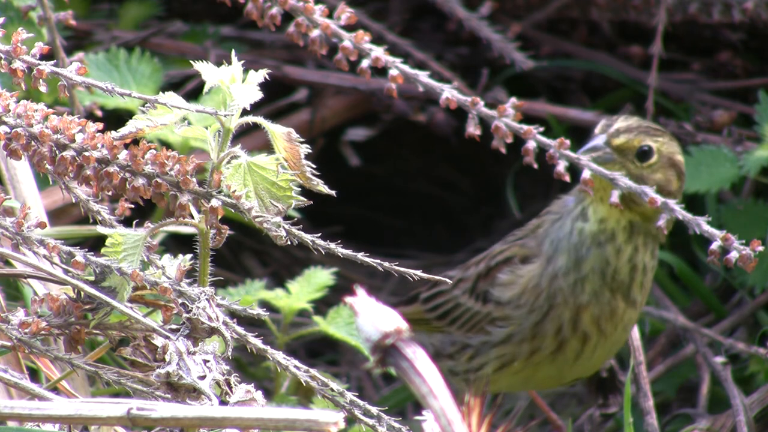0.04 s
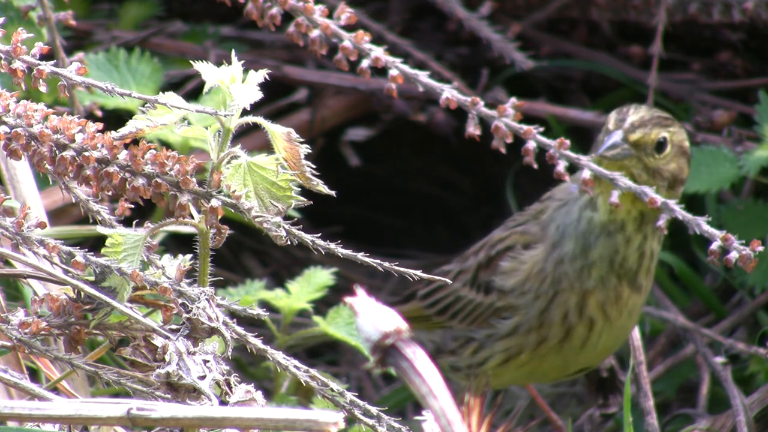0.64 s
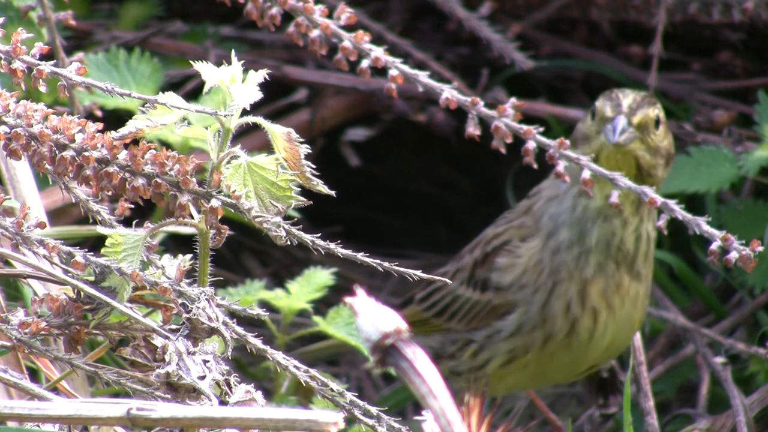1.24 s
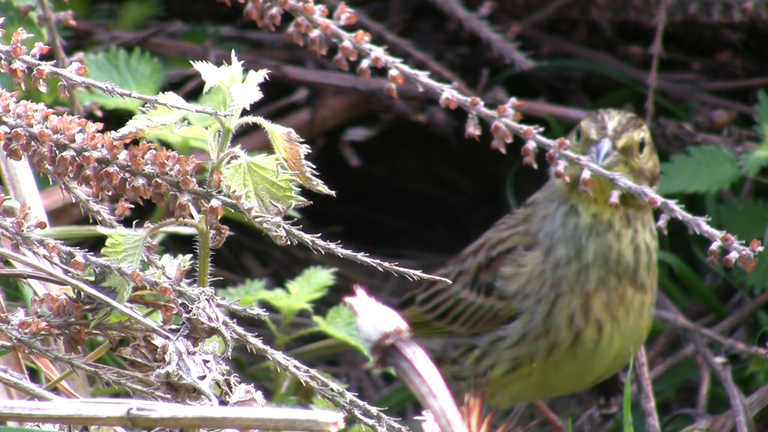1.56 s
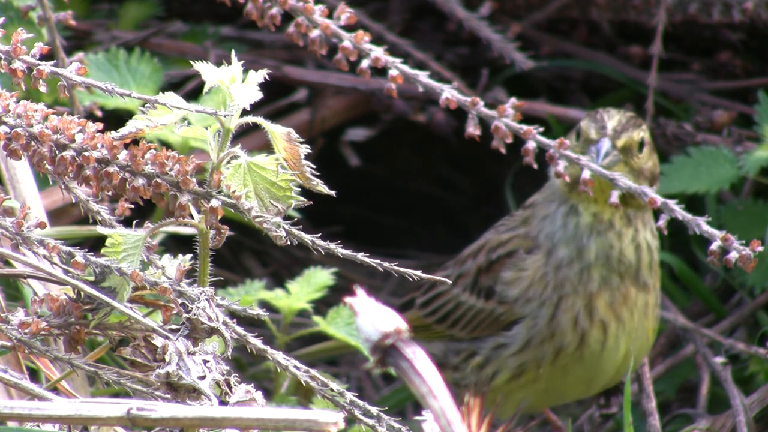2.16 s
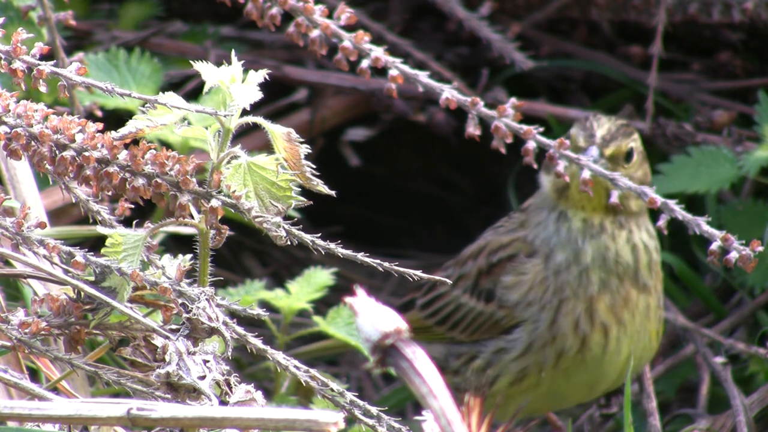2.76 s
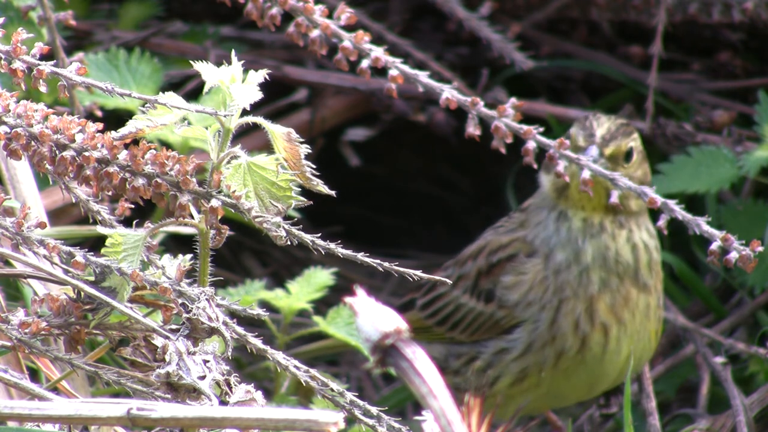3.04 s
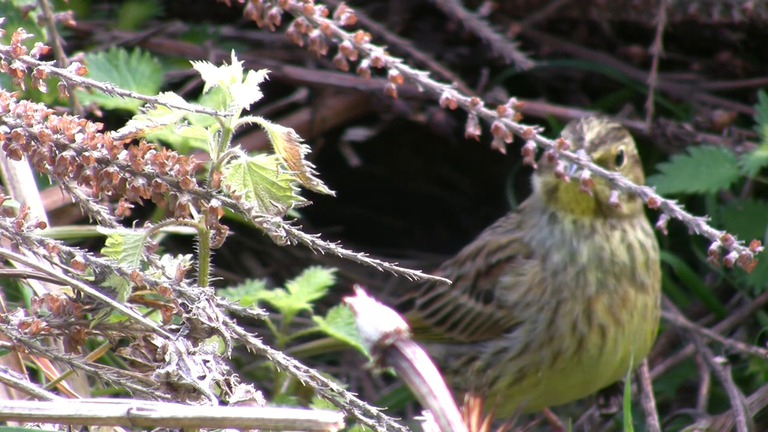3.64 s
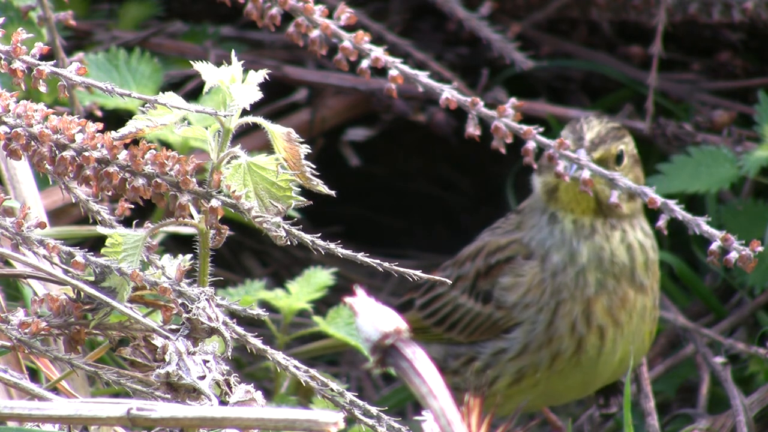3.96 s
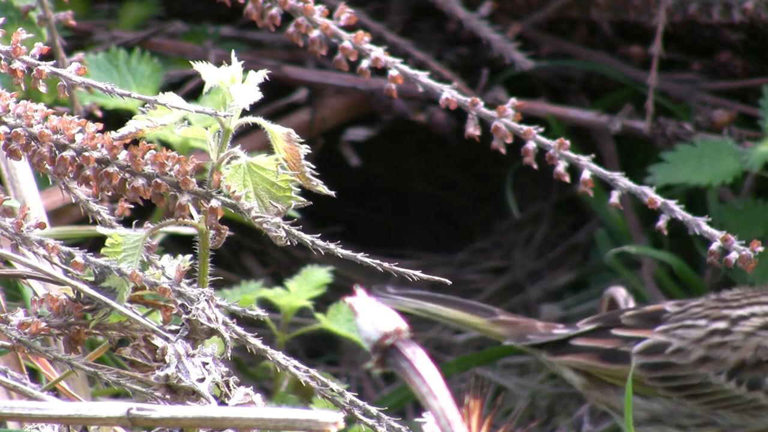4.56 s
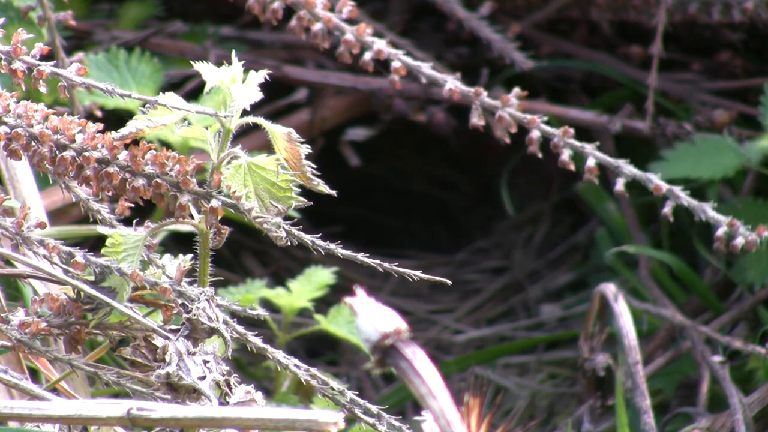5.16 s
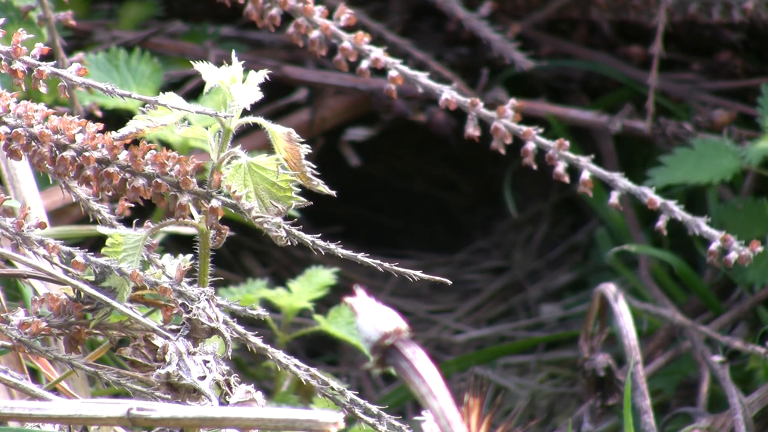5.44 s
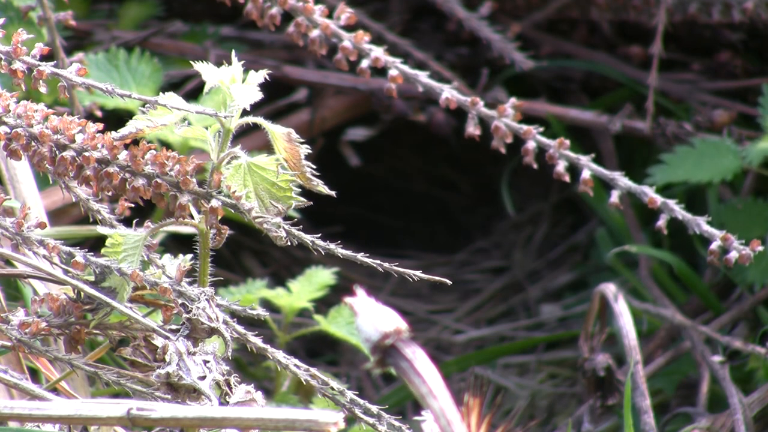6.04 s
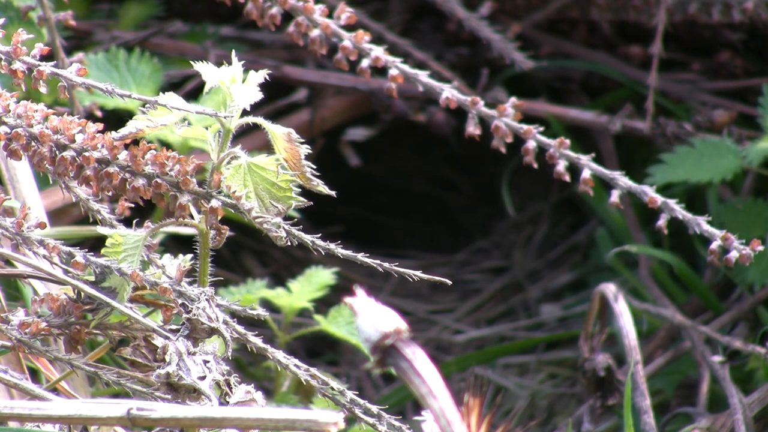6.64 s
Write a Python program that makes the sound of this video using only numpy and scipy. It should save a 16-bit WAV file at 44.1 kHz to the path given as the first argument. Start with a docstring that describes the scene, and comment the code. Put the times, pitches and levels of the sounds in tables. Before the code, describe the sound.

Songbirds chirp over a soft countryside hush, joined halfway by low wind rumble, a faint rustle and a fast high trill ending in a buzz.

```python
"""An overgrown garden, on a stereo microphone open to the hush of the countryside.
A great tit see-saws far off, a finch twitters nearby and small birds call faintly from the hedges;
their whistles are near sines from the syrinx, echoed by leaves. Halfway through, wind starts to buffet
the microphone and a bird hops away through dry stems. A yellowhammer sings its rattle of fifteen notes
and one long buzzy wheeze, and a hoarse chatter pulses in the distance at the end."""
import sys
import numpy as np
from scipy import signal
from scipy.io import wavfile
from scipy.ndimage import uniform_filter1d, map_coordinates

SR = 44100
rng = np.random.default_rng(int(sys.argv[2]) if len(sys.argv) > 2 else 0)


def waveform_to_disk(signal):
    """Save audio, clipped to [-1, 1], as 16-bit WAV at the path in sys.argv[1]."""
    frames = np.transpose(np.atleast_2d(signal))
    scaled = np.clip(frames, -1, 1) * 32767
    samples = np.round(scaled).astype(np.int16)
    wavfile.write(sys.argv[1], SR, samples)


N = 304290
TIME = np.arange(N) / SR

# The hush of far countryside. Each row: frequency in Hz, relative density in dB.
AIR_SPECTRUM = [(13, -28), (22, 4.5), (54, 0), (239, -2), (475, -0.5), (823, -4.3), (1770, -12),
                (2530, -12), (2830, -15), (3820, -17), (6620, -25.5), (12400, -29.5), (15500, -33)]
# How alike the hush is on the two channels. Each row: frequency in Hz, left-right correlation.
AIR_CORRELATION = [(40, 0.089), (300, 0), (1000, 0), (4000, 0.0), (14000, 0.0)]
# The great tit far off, high and low in turn. Each row: start in seconds, pitch in Hz, level in dB.
TIT_SONG = [(0.085, 3486, -42.5), (0.282, 2387, -51.5), (0.545, 3450, -45), (0.78, 2372, -53),
            (1.099, 3565, -42.5), (1.373, 2304, -55), (1.713, 3560, -46.5), (1.963, 2368, -52.5)]
# Its high note, then its low one. Each row: length in seconds, bend as a share of pitch, warble in Hz.
TIT_SHAPES = [(.056, 0.017, 179), (.12, -0.026, 119)]
# Soft far whistles. Each row: start and length in seconds, first and last pitch in Hz, level in dB.
GLIDE_NOTES = [(0.121, 0.1, 2480, 2290, -70.5), (0.874, 0.11, 4680, 4320, -76),
               (1.042, 0.06, 2720, 2530, -69), (1.124, .045, 3010, 2920, -66),
               (3.017, 0.08, 5770, 5270, -77), (6.014, 0.0327, 2276, 2810, -57)]
# Dry stems snapping. Each row: start in seconds, level in dB.
STEM_SNAPS = [(0.203, -54), (0.549, -59), (4.7525, -56), (4.793, -50), (4.8273, -54), (4.8647, -59),
              (4.9156, -53), (4.9695, -65), (5.017, -66)]
# Stems brushed by the hopping bird. Each row: time in seconds, level in dB.
RUSTLE_LEVELS = [(4.2, -95), (4.65, -85), (4.8, -67.5), (4.98, -56), (5.25, -61.5), (5.6, -67), (6.9, -66)]
# The colour of that rustle. Each row: frequency in Hz, relative density in dB.
RUSTLE_SPECTRUM = [(300, 4.5), (600, 7), (1200, 2.5), (2500, -5), (7000, -16.5), (11000, -18.5),
                   (13000, -16.5), (16000, -20)]
# The finch nearby. Each row: start and length in seconds, first, middle and last pitch in Hz,
# level in dB, warble depth in Hz.
FINCH_NOTES = [(2.101, 0.068, 4790, 4540, 4990, -46, 452), (2.152, 0.064, 5070, 5800, 5640, -44, 550),
               (2.215, 0.039, 5560, 4680, 4620, -39.5, 8), (2.341, 0.024, 4220, 4210, 4290, -39, -7),
               (2.361, 0.095, 4200, 4130, 3850, -46, 450), (2.451, 0.025, 3770, 3535, 3400, -39, 8),
               (2.546, 0.045, 3640, 3820, 3850, -42, 30), (2.593, 0.018, 5940, 4540, 4200, -40, -2),
               (2.761, 0.057, 2890, 2500, 2360, -52.5, 90), (5.394, 0.087, 4810, 4390, 4890, -45, 500),
               (5.487, 0.067, 4900, 4460, 3970, -41, 248), (5.541, .065, 3980, 3930, 4010, -53, 0),
               (5.646, 0.064, 4000, 4166, 4120, -46.5, 35), (5.701, 0.0224, 6000, 4750, 4260, -42, 10),
               (6.074, .055, 2600, 2810, 3000, -52.5, 70), (6.096, 0.16, 3250, 3555, 2825, -44, 204),
               (6.214, 0.031, 3810, 3750, 3350, -42.5, 0), (6.319, .048, 4820, 4284, 4060, -42, 105),
               (6.424, 0.012, 5170, 6610, 7530, -38.5, -2), (6.427, 0.047, 4070, 4070, 4130, -44.5, 82),
               (6.524, 0.02, 5500, 5620, 5680, -54.5, 0), (6.577, 0.113, 3080, 3200, 3200, -57, 230)]
# The pace of its warble. Each row: time in seconds, warbles per second.
FINCH_WARBLE_RATES = [(2.2, 99), (5.45, 116), (5.82, 130), (6.09, 64)]
# Its dry chips. Each row: start in seconds, rough pitch in Hz, level in dB.
FINCH_CHIPS = [(2.604, 4800, -44.5), (2.91, 3760, -49), (2.928, 2946, -47.5), (5.71, 4430, -42),
               (6.007, 3900, -44.5), (6.313, 4000, -40.5), (6.412, 4760, -39), (6.652, 4900, -50.5),
               (6.701, 5030, -54), (6.726, 4900, -44.5)]
# Its refrain, a swoop down and back up. Each row: seconds into the swoop, pitch in Hz,
# relative level in dB, warble depth in Hz.
SWOOP_CONTOUR = [(0, 4370, -6, 80), (.027, 4340, 4, 183), (0.051, 3495, -2, 231), (.08, 3073, -7.5, 200),
                 (.108, 3350, 0.5, 200), (.137, 3690, -3, 140), (.172, 3700, -18, 50)]
# Where the refrain comes. Each row: start in seconds, level in dB.
FINCH_SWOOPS = [(2.70, -44), (5.818, -43)]
# A far bird's thin pipe and its lower afternote. Each row: seconds into the call, pitch in Hz,
# relative level in dB, warble depth in Hz.
PIPE_CONTOUR = [(0, 4214, -4, 0), (.02, 4253, -5, 0), (.085, 4200, -2.5, 0), (.115, 4150, -24, 0)]
AFTERNOTE_CONTOUR = [(.14, 3650, -5, 50), (.17, 3780, -8, 100), (.185, 3150, -4.5, 100),
                     (.24, 3010, -10.5, 100)]
# Faint arched chirps in the hedges. Each row: time in seconds, pitch near the top in Hz, level in dB.
ARCHED_CHIRPS = [(2.83, 2065, -61.5), (2.94, 2610, -65), (3.149, 2673, -59), (3.26, 2715, -63),
                 (3.359, 2547, -66), (3.62, 2730, -64), (3.739, 2640, -66.5), (3.96, 2640, -63),
                 (4.06, 2810, -66.5), (4.18, 2750, -63), (4.384, 2776, -59.5), (4.49, 2850, -64.5),
                 (4.615, 2670, -63.5)]
# The arch they share. Each row: seconds from the chirp's time, share of its pitch,
# relative level in dB, warble depth in Hz.
ARCH_CONTOUR = [(-.004, .6, -1.5, 22), (.014, 0.97, 3, 80), (.03, 0.98, 3.5, 110), (.05, .84, -2, 110),
                (.076, 0.53, -2, 120)]
# Gusts on the microphone. Each row: start in seconds, hold in seconds, level in dB.
WIND_GUSTS = [(3.416, 0.428, -36.5), (3.962, 0.13, -40.5), (4.199, 0.012, -53), (4.313, 0.037, -39),
              (4.4, .12, -50.5), (4.688, 0.11, -34), (4.863, 0.092, -37), (5.058, 0.082, -37.5),
              (5.284, 0.16, -39), (5.602, 0.041, -41.5), (5.759, 1.13, -42), (5.94, 0.035, -37),
              (6.336, .07, -36), (6.469, 0.16, -35.5), (6.697, 0.0067, -34)]
# The colour of their rumble. Each row: frequency in Hz, relative density in dB.
WIND_SPECTRUM = [(13, -51), (22, -24.5), (53, 5.5), (92, 4), (149, -5), (238, -23), (376, -50), (420, -29),
                 (550, -69), (920, -120)]
# Single eddies striking the microphone. Each row: time of the peak in seconds, level in dB.
WIND_BUFFETS = [(4.735, -17), (4.893, -31)]
# The down-slur and up-flick of a yellowhammer's rattle note. Each row: seconds from the note's time,
# pitch in Hz, relative level in dB, warble depth in Hz.
SLUR_CONTOUR = [(-.045, 6600, -22, 220), (-.032, 6380, -14.5, 251), (-.021, 6165, -6.5, 244),
                (-.014, 5950, -3.5, 86), (-.010, 5740, -5, -3)]
FLICK_CONTOUR = [(-.014, 4660, 0, 0), (-.009, 4795, -4.5, 0.0011), (-.004, 5080, -1.5, 0.0019),
                 (.001, 5380, 3.5, 0), (.007, 5200, -14, 0)]
# Its closing wheeze. Each row: time in seconds, pitch in Hz, level in dB.
WHEEZE_CONTOUR = [(5.99, 5126, -77), (6.01, 4940, -51), (6.068, 4796, -44.5), (6.294, 4700, -49.5),
                  (6.522, 4762, -48.5), (6.58, 4755, -50), (6.62, 4730, -70)]
# A small bird's quick upward chirps. Each row: start in seconds, level in dB.
UPWARD_CHIRPS = [(5.628, -58), (5.675, -52.5), (5.728, -50.5), (6.376, -55.5), (6.448, -60), (6.483, -59),
                 (6.551, -55)]
# A high lisp in the hedges. Each row: time in seconds, pitch in Hz, level in dB, warble depth in Hz.
LISP_CONTOUR = [(5.629, 7170, -69, 346), (5.72, 7210, -67, 500), (5.80, 7120, -67, 300),
                (5.90, 7380, -73, 403)]
# Distant hoarse chatter. Each row: start in seconds, rough pulses per second, level in dB.
CHATTER_BURSTS = [(6.386, 146, -54), (6.458, 158, -54.5), (6.524, 152, -55.5), (6.596, 163, -53.5),
                  (6.685, 170, -56), (6.77, 148, -55), (6.854, 180, -57)]
# That bird's throat resonances. Each row: centre in Hz, width in Hz, relative level in dB.
THROAT_RESONANCES = [(1245, 150, -4.5), (1536, 210, 2), (1780, 220, 3.5), (2020, 110, 6.5)]


def from_db(db):
    """Decibels to gain."""
    return 10 ** (np.asarray(db) / 20)


def unit_rms(x):
    """Scale to an rms of one."""
    return x / np.sqrt(np.mean(x ** 2) + 1e-20)


def along(rows, t):
    """Each column of a curve at times t."""
    times, *columns = np.transpose(sorted(map(tuple, rows)))
    return [np.interp(t, times, column) for column in columns]


def at_hz(rows, hz):
    """Read a spectrum on a log-frequency axis."""
    frequencies, values = np.transpose(rows)
    return np.interp(np.log(hz), np.log(frequencies), values)


def drift(rate, size):
    """A smooth random wander with about `rate` turns a second and a spread near one."""
    steps = np.arange(size) * rate / SR
    knots = rng.standard_normal(int(steps[-1]) + 4)
    return map_coordinates(knots, [steps + 1], order=3, mode="nearest")


def band(x, low_hz, high_hz):
    """Butterworth band-pass."""
    sos = signal.butter(2, [low_hz, min(high_hz, .47 * SR)], "band", fs=SR, output="sos")
    return signal.sosfilt(sos, x + 1e-18)


def add(track, start, sound):
    """Mix a sound into a track, `start` seconds in."""
    at = int(np.clip(round(start * SR), 0, N))
    track[at:at + len(sound)] += sound[:N - at]


def coloured_noise(spectrum, correlation, grain=1.0):
    """Stereo noise of unit rms, built in half-octave bands; `grain` flutters its level."""
    white, out = rng.standard_normal((2, 2, N)) * grain, 0
    lowest, highest = spectrum[0][0], spectrum[-1][0]
    edges = np.geomspace(lowest, highest, int(2 * np.log2(highest / lowest)) + 2)
    for k, (low, high) in enumerate(zip(edges, edges[1:])):
        mid, side = band(white[k % 2], low, high)
        hz = np.sqrt(low * high)
        alike = np.clip(at_hz(correlation, hz), -1, 1)
        stereo = np.sqrt(1 + alike) * mid + np.sqrt(1 - alike) * side * [[1], [-1]]
        out = out + from_db(at_hz(spectrum, hz)) * stereo
    return unit_rms(out)


def panned(x, pan_db):
    """Place a sound across the microphone; positive is louder on the left."""
    return x * from_db(np.array([[pan_db], [-pan_db]]) / 2)


def garden(x, pan_db, wet_db, t60, lag_ms=0.0, spread=1.0):
    """Direct sound plus echoes off leaves and hedges, from one bearing (spread 0) or all around (1)."""
    t = np.arange(int(.9 * SR)) / SR
    echoes = (rng.random((3, len(t))) < 1500 / SR) * rng.standard_normal((3, len(t)))  # 1500 a second
    stereo_echoes = np.sqrt(1 - spread) * echoes[2] + np.sqrt(spread) * echoes[:2]
    near_leaves = 1 + 1.2 * np.exp(-t / .018)
    scatter = stereo_echoes * from_db(-60 * t / t60) * near_leaves
    tail = unit_rms(signal.fftconvolve(x[None], scatter, axes=1)[:, :N]) * np.std(x)
    wet = from_db(wet_db)
    left, right = panned((x + wet * tail) / np.hypot(1, wet), pan_db)
    return np.array([np.roll(left, round(lag_ms * SR / 1000)), right])


def whistle(contour, warble_rate=280.0, unsteady=0.0048, throb=0.0, overtone_db=-42):
    """A syrinx tone: a near sine on a pitch contour, with a fast warble that can also shake its level."""
    times = [row[0] for row in contour]
    t = np.arange(min(times), max(times) + .001, 1 / SR)
    hz, level_db, warble_hz = along(contour, t)
    cycle = 2 * np.pi * np.cumsum(warble_rate * (1 + 0.078 * drift(93.6, len(t)))) / SR
    warble = warble_hz * (1 + 0.22 * drift(120.9, len(t))) * np.sin(cycle)
    pitch = hz * (1 + unsteady * drift(408.2, len(t))) + warble
    phase = 2 * np.pi * np.cumsum(pitch) / SR
    tone = np.sin(phase) + from_db(overtone_db) * np.sin(2 * phase)
    fades = np.clip(np.minimum(t - t[0], t[-1] - t) / .003, 0, 1)
    return np.sqrt(2) * from_db(level_db) * fades * (1 + throb * np.cos(cycle)) * tone


def bend(length, pitches, level_db=0, warble_hz=0, attack_s=0.0095, release_s=0.0085, edge_db=8):
    """Contour of a note that arcs through three pitches, softer at its ends, warbling most midway."""
    progress = np.linspace(0, 1, 41)
    hz = np.polyval(np.polyfit([0, .5, 1], pitches, deg=2), progress)
    opening = np.clip(np.minimum(progress * length / attack_s, (1 - progress) * length / release_s), 0, 1)
    depth_hz = warble_hz * 2 * np.sqrt(progress * (1 - progress))
    return list(zip(progress * length, hz, level_db - edge_db * (1 - opening), depth_hz))


def repeated(events, contour, **voice):
    """The same syllable sung afresh at each time and level."""
    out = np.zeros(N)
    for when, level_db in events:
        add(out, when + contour[0][0], from_db(level_db) * whistle(contour, **voice))
    return out


def countryside_air(level_db=-58.5):
    """A steady, wide hush from far beyond the garden."""
    return from_db(level_db) * coloured_noise(AIR_SPECTRUM, AIR_CORRELATION)


def great_tit(onset_db=-11.5, end_db=-10.5):
    """Far off and echoing; the high note is rough and lifts, the low one is smoother and sags."""
    song = np.zeros(N)
    for k, (start, hz, level_db) in enumerate(TIT_SONG):
        length, lift, warble_hz = TIT_SHAPES[k % 2]
        note = [(0, hz * (1 - lift), onset_db, warble_hz),
                (length / 2, hz, 0, warble_hz),
                (length, hz * (1 + lift), end_db, warble_hz)]
        add(song, start, from_db(level_db) * whistle(note, warble_rate=110, unsteady=0.017))
    return garden(song, pan_db=-1.5, wet_db=4.0, t60=0.5, lag_ms=.08, spread=0.25)


def far_glides():
    """Lone soft whistles that slide and settle, far off to the right."""
    glides = np.zeros(N)
    for start, length, first_hz, last_hz, level_db in GLIDE_NOTES:
        pitches = (first_hz, .3 * first_hz + .7 * last_hz, last_hz)
        add(glides, start, whistle(bend(length, pitches, level_db), unsteady=0.0051))
    return garden(glides, pan_db=-9, wet_db=-4, t60=0.39)


def far_twitter(count=26, level_db=-74, span_s=4):
    """A bird at the edge of hearing scatters tiny falling slurs through the first seconds."""
    slurs = np.zeros(N)
    for when, pitch, slope in rng.random((count, 3)):
        hz = 3700 + 1400 * pitch
        last_hz = hz * (0.61 + 0.22 * slope)
        slur = [(0, hz, level_db + 1, 60), (.02, hz, level_db, 59.5), (.045, last_hz, level_db - 2, 60)]
        add(slurs, span_s * when, whistle(slur))
    return garden(slurs, pan_db=1, wet_db=7, t60=.4)


def dry_stems(grain_db=4, grains_per_s=330):
    """Stalks give sharp little snaps, and a grainy rustle as a hopping bird brushes them."""
    rustle_db, = along(RUSTLE_LEVELS, TIME)
    grain = from_db(grain_db * np.clip(drift(grains_per_s, N), -2, 2))
    rustle = from_db(rustle_db) * coloured_noise(RUSTLE_SPECTRUM, [(1000, 0.25)], grain)
    snaps, t = np.zeros(N), np.arange(SR // 50) / SR
    for start, level_db in STEM_SNAPS:
        add(snaps, start, from_db(level_db) * rng.standard_normal(len(t)) * np.exp(-t / 0.0023))
    return rustle + garden(band(snaps, 10600, 16000), pan_db=2.0, wet_db=6, t60=0.13)


def finch_song():
    """Nearby on the left: warbled slurs, each one bend of pitch, and a returning swoop."""
    notes = [(start, level_db, bend(length, pitches, warble_hz=warble_hz))
             for start, length, *pitches, level_db, warble_hz in FINCH_NOTES]
    swoops = [(start, level_db, SWOOP_CONTOUR) for start, level_db in FINCH_SWOOPS]
    song = np.zeros(N)
    for start, level_db, contour in notes + swoops:
        pace, = along(FINCH_WARBLE_RATES, start)
        add(song, start, from_db(level_db) * whistle(contour, warble_rate=pace, unsteady=0.0027))
    return garden(song, pan_db=4.5, wet_db=-1.5, t60=0.29, lag_ms=-.07)


def finch_chips():
    """The finch breaks its song with dry chips, each a brief rasp of noise."""
    chips, t = np.zeros(N), np.arange(int(0.074 * SR)) / SR
    envelope = (1 - np.exp(-t / 0.0025)) * np.exp(-t / 0.015)
    for start, hz, level_db in FINCH_CHIPS:
        rasp = unit_rms(band(rng.standard_normal(len(t)), hz * 0.77, hz * 1.1))
        add(chips, start, from_db(level_db) * rasp * envelope)
    return garden(chips, pan_db=1.0, wet_db=1.5, t60=0.35)


def far_piping(count=5, start_s=2.757, gap_s=.344, first_db=-58.5, growth_db=0.75):
    """A far bird's thin whistle with a lower afternote, evenly repeated and growing louder."""
    calls = [(start_s + k * gap_s, first_db + k * growth_db) for k in range(count)]
    pipes = repeated(calls, PIPE_CONTOUR, unsteady=0.0035)
    afternotes = repeated(calls, AFTERNOTE_CONTOUR, unsteady=0.021)
    return (garden(pipes, pan_db=2.5, wet_db=-1, t60=0.72, lag_ms=-.02)
            + garden(afternotes, pan_db=3.5, wet_db=7.5, t60=0.19))


def arched_chirps():
    """Faint whistles that rise and fall, from the hedges on the right."""
    chirps = np.zeros(N)
    for when, hz, level_db in ARCHED_CHIRPS:
        arch = [(t, share * hz, db, warble_hz) for t, share, db, warble_hz in ARCH_CONTOUR]
        add(chirps, when + arch[0][0], from_db(level_db) * whistle(arch, warble_rate=132, unsteady=0.02))
    return garden(chirps, pan_db=-3, wet_db=4.5, t60=0.43)


def gust_strength(rise_s=0.011, fall_s=0.014, breeze_db=-53):
    """Each gust rises, holds and falls away; their powers add to a breeze that comes with the first."""
    power = from_db(breeze_db) ** 2 * np.clip((TIME - WIND_GUSTS[0][0]) / rise_s, 0, 1)
    for start, hold, level_db in WIND_GUSTS:
        fade = np.maximum(start - TIME, 0) / rise_s + np.maximum(TIME - start - hold, 0) / fall_s
        power = power + (from_db(level_db) * np.exp(-np.minimum(fade, 20))) ** 2
    return np.sqrt(power)


def wind_buffets(hz=111.4, decay_s=0.0071):
    """Single eddies strike the microphone, each a short low thump."""
    buffets, t = np.zeros(N), np.arange(-SR // 20, SR // 20) / SR
    thump = -np.cos(2 * np.pi * hz * t) * np.exp(-np.abs(t) / decay_s)
    for when, level_db in WIND_BUFFETS:
        add(buffets, when + t[0], from_db(level_db) * thump)
    return buffets


def microphone_wind(swirl_hz=(142, 236), swirl_db=-45.5, hard_gust_db=-33, swirl_growth=2.14):
    """Lumpy pressure on the ports, stronger on the left and of opposite sign on the right."""
    strength = gust_strength()
    eddies = coloured_noise(WIND_SPECTRUM, correlation=[(100, -0.86)])
    eddy_power = uniform_filter1d(np.mean(eddies ** 2, axis=0), int(.06 * SR))
    rumble = strength * eddies / np.sqrt(eddy_power + 0.014)  # evened out, so the gusts set the level
    # Hard gusts shed a swirl of smaller eddies too.
    swirl_gain = from_db(swirl_db) * (strength / from_db(hard_gust_db)) ** swirl_growth
    swirl = swirl_gain * unit_rms(band(rng.standard_normal(N), *swirl_hz))
    return panned(rumble + (swirl + wind_buffets()) * [[1], [-1]], pan_db=7.0)


def yellowhammer_rattle(count=15, start_s=4.199, settled_gap_s=.0925, full_db=-38, swell_db=24.5):
    """Each note is a down-slur and an up-flick, one from each side of the syrinx."""
    k = np.arange(count)
    gaps = settled_gap_s + .0145 * np.exp(-k / 4.0)  # the notes come a little faster
    levels_db = full_db - swell_db * np.exp(-k / 2.93)  # and swell towards full voice
    notes = list(zip(start_s + np.cumsum(gaps) - gaps, levels_db))
    slurs = repeated(notes, SLUR_CONTOUR, warble_rate=177, unsteady=0.0183, overtone_db=-30)
    flicks = repeated(notes, FLICK_CONTOUR, unsteady=0.023)
    return garden(slurs + flicks, pan_db=-1.6, wet_db=1.0, t60=0.3, lag_ms=-.02, spread=0.99)


def yellowhammer_wheeze(buzz_per_s=260, buzz_depth_hz=80):
    """The song closes on one long tone, buzzing fast in pitch and level."""
    contour = [(*row, buzz_depth_hz) for row in WHEEZE_CONTOUR]
    wheeze = np.zeros(N)
    add(wheeze, contour[0][0], whistle(contour, warble_rate=buzz_per_s, unsteady=0.007, throb=0.36))
    return garden(wheeze, pan_db=-0.5, wet_db=-6.0, t60=0.49, lag_ms=-.02)


def upward_chirps(length_s=0.0289, pitches_hz=(2580, 3290, 3760)):
    """A small bird off to the right flicks out quick rising whistles, all of one shape."""
    chirps = repeated(UPWARD_CHIRPS, bend(length_s, pitches_hz), unsteady=0.016)
    return garden(chirps, pan_db=-4.5, wet_db=0.5, t60=0.52)


def high_lisp():
    """A thin warbled tone from the hedges that reaches the microphone mostly as echo."""
    lisp = np.zeros(N)
    add(lisp, LISP_CONTOUR[0][0], whistle(LISP_CONTOUR, warble_rate=64, unsteady=0.018))
    return garden(lisp, pan_db=2, wet_db=15, t60=0.38)


def hoarse_chatter(burst_s=.055):
    """In the distance on the left, short bursts of slow pulses ring in a narrow throat."""
    pulses, t = np.zeros(N), np.arange(int(burst_s * SR)) / SR
    arch = np.sin(np.pi * t / t[-1])
    for start, per_s, level_db in CHATTER_BURSTS:
        cycles = np.cumsum(per_s * (.96 + .05 * arch + 0.015 * drift(300, len(t)))) / SR
        ticks = np.diff(np.floor(cycles), prepend=0)  # one pulse a cycle
        add(pulses, start, ticks * np.sqrt(np.abs(arch) * SR / per_s) * from_db(level_db))
    click = signal.unit_impulse(len(t))
    ringing = sum((-1) ** k * from_db(db) * signal.lfilter(*signal.iirpeak(hz, hz / width, fs=SR), click)
                  for k, (hz, width, db) in enumerate(THROAT_RESONANCES))
    throat = band(ringing, 970, 1763)
    voice = signal.oaconvolve(pulses, throat / np.linalg.norm(throat))[:N]
    return garden(voice, pan_db=4, wet_db=1.5, t60=0.85)


def scene():
    """Birds, stems and wind at the microphone, over the steady hush of the countryside."""
    singers = yellowhammer_rattle() + yellowhammer_wheeze() + finch_song() + finch_chips() + great_tit()
    hedge_birds = far_piping() + arched_chirps() + high_lisp()
    far_birds = far_glides() + upward_chirps() + far_twitter() + hoarse_chatter()
    return singers + hedge_birds + far_birds + dry_stems() + microphone_wind() + countryside_air()


def record(dry):
    """The top is cut steeply above 15.7 kHz."""
    return signal.sosfilt(signal.ellip(10, .2, 70, 15700, fs=SR, output="sos"), dry)


dry = scene()
out = record(dry)
waveform_to_disk(out)
```